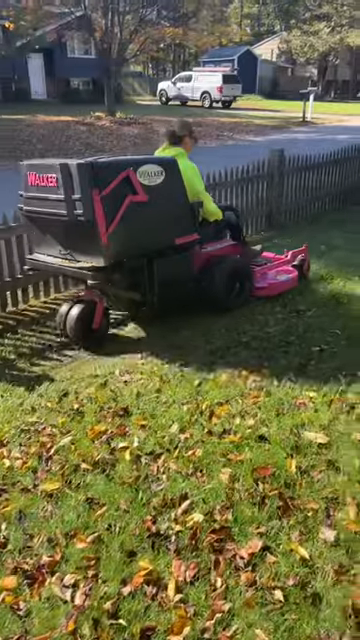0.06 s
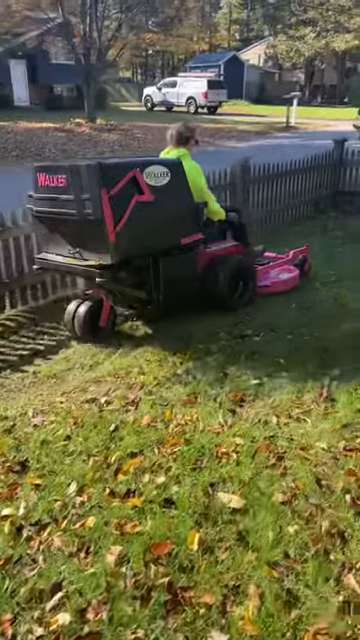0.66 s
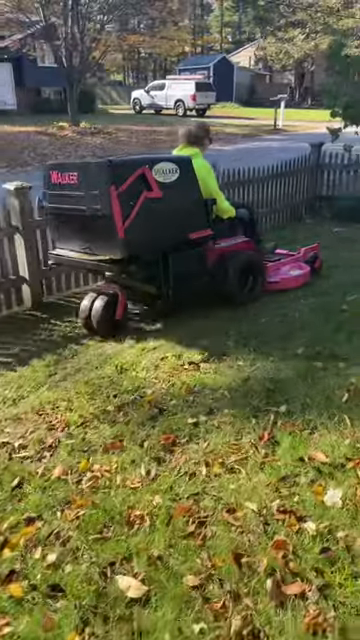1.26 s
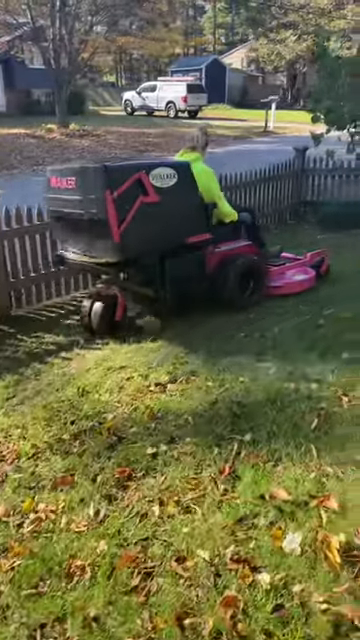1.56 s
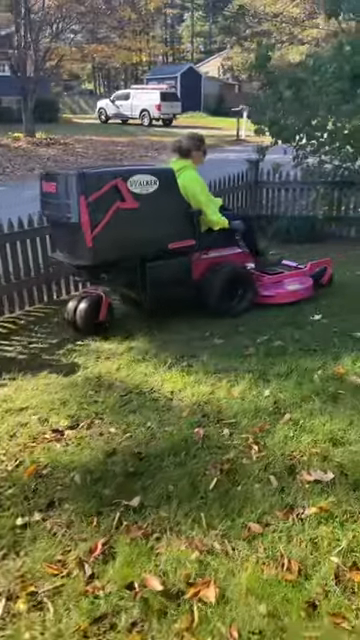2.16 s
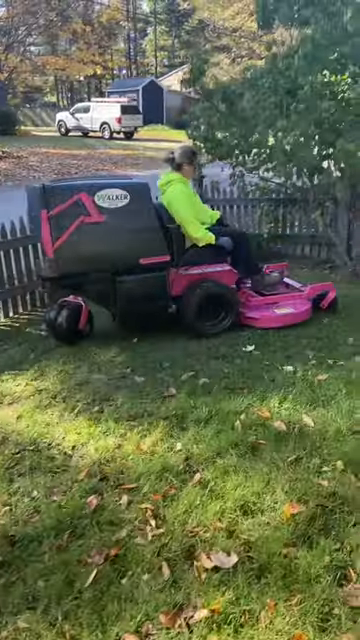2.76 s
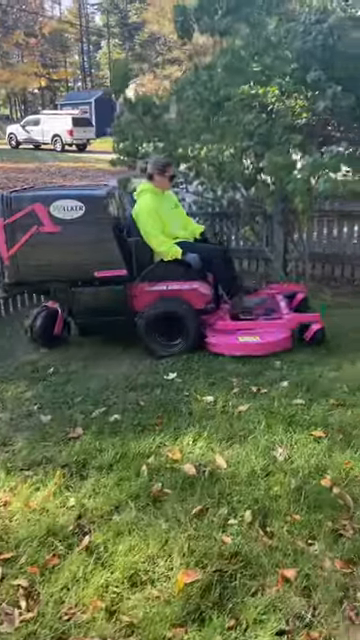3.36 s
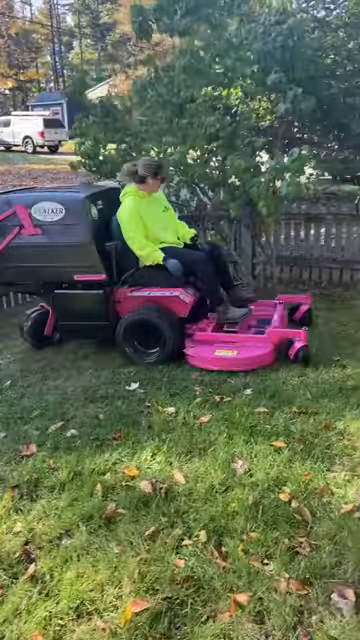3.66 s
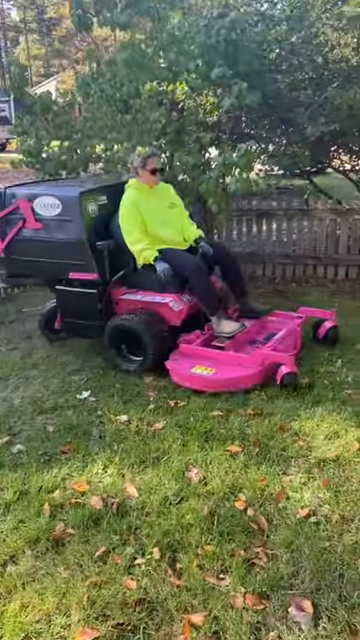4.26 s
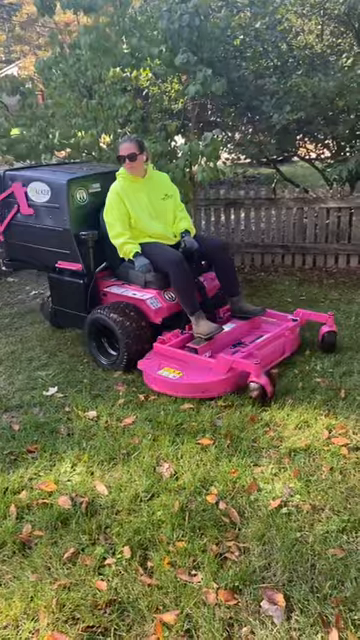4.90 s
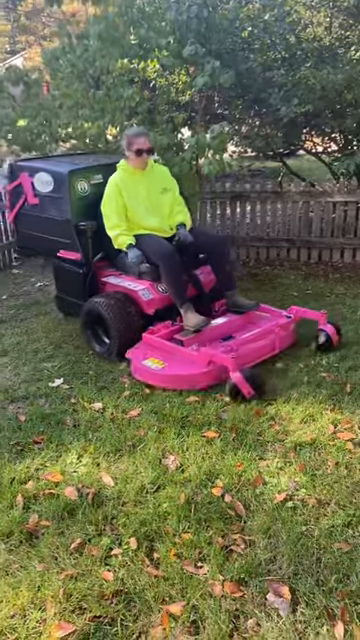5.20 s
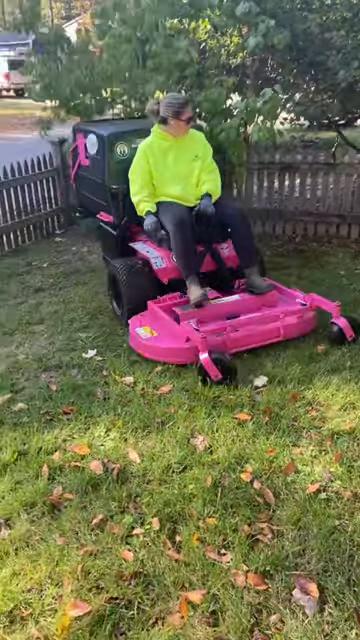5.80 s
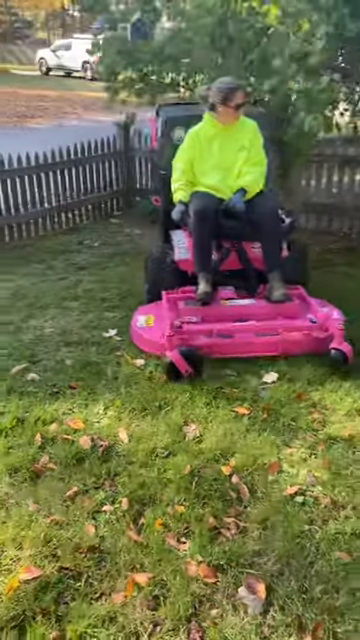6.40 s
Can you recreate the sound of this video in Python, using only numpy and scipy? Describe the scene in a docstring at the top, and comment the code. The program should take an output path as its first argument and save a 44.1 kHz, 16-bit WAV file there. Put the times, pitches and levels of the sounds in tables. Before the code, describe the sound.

A ride-on mower runs at steady speed on a leafy lawn. Its engine chugs under a low blade hum, a blower drone and a constant rush of air, with hissing leaves and a thin metallic ring. Twigs click against the deck now and then. As the mower turns to face the microphone, the hum swells and wavers, one twig snaps sharply, and an airy howl grows a little louder.

```python
"""A ride-on mower turns on a leafy lawn. It starts with its tail angled to the listener: one governed
engine chugs and drives blades and collector blower by belts, air roars through deck and chute, metal
rings thinly and twigs tick. Near 3 s it is side-on and the hopper shades the exhaust. From 4 s the
blades' octave swells and beats against the blower; the sharpest twig strikes at 5.4 s, and the chute's
howl rises in level as the nose comes round to face the listener."""
import sys
import numpy as np
from scipy import signal
from scipy.fft import rfft, irfft, next_fast_len
from scipy.io import wavfile
from scipy.ndimage import uniform_filter1d, map_coordinates

SR = 44100
rng = np.random.default_rng(int(sys.argv[2]) if len(sys.argv) > 2 else 0)


def to_wav(s):
    """Save 16-bit WAV."""
    ch = np.atleast_2d(s).T  # columns
    pcm = np.round(np.clip(ch, -1, 1) * 32767)  # PCM
    wavfile.write(sys.argv[1], SR, pcm.astype(np.int16))


N = 292824


def amp(db):
    """Decibels to gain."""
    return 10 ** (np.asarray(db) / 20)


def unit(x):
    """Scale to rms 1."""
    return x / np.sqrt(np.mean(x ** 2) + 1e-20)


def along(points, hz):
    """Read (f/Hz, value) points on a log frequency axis."""
    f, v = np.transpose(points)
    return np.interp(np.log(hz + 1), np.log(f + 1), v)


def colour(points):
    """An EQ curve: gain against frequency from (f/Hz, level/dB) points."""
    return lambda hz: amp(along(points, hz))


def curves(rows):
    """Automation lanes: one value per sample for each column after the time."""
    times, *columns = np.transpose(rows)
    return [np.interp(np.arange(N) / SR, times, column) for column in columns]


def wobble(rate):
    """A smooth random curve, rate knots a second."""
    knots = rng.standard_normal(int(N * rate / SR) + 4)
    coarse = np.arange(0, N + 32, 32)
    smooth = map_coordinates(knots, [coarse * rate / SR], mode="mirror")
    return np.interp(np.arange(N), coarse, smooth)


def filtered(x, response):
    """Pass x through a complex frequency response."""
    size = next_fast_len(N + SR // 4)
    return irfft(rfft(x, size) * response(np.fft.rfftfreq(size, 1 / SR)), size)[..., :N]


def tone(turns, db, flutter):
    """One partial following a count of cycles, its strength and phase shaken by turbulence."""
    angle = 2 * np.pi * turns + flutter * wobble(25)
    return np.sqrt(2) * amp(db) * (1 + flutter * wobble(25)) * np.sin(angle)


def overtones(turns, table, fade_db, flutter):
    """Weak partials that fade in and out as their paths to the listener shift."""
    return sum(tone(k * turns + rng.random(), db - 8 + fade_db * wobble(1.48), flutter)
               for k, db in table)


def throb(turns, depth):
    """A swell of loudness once per turn."""
    return unit(np.exp(depth * np.cos(2 * np.pi * (turns + rng.random()))))


# Stereo image of the turbulence, wider in the treble: f/Hz, left-right likeness/0-1
LIKENESS = [(60, .98), (150, .997), (280, .9995), (450, .99), (1300, .988), (1900, .996), (2500, .88),
            (3400, .82), (5000, .85), (10000, .86), (15000, .8)]
def rush(gain, patchy_db):
    """Stereo turbulence of rms 1, with drifting patches in its spectrum."""
    spectra = signal.stft(rng.standard_normal((2, N)), nperseg=1024)[2]
    patches = uniform_filter1d(rng.standard_normal(spectra.shape[1:]), size=5, axis=0)
    patches = uniform_filter1d(patches, size=30, axis=1)
    pair = signal.istft(spectra * amp(patchy_db * unit(patches)), nperseg=1024)[1][:, :N]
    width = lambda hz: np.arccos(np.clip(along(LIKENESS, hz), -1, 1)) / 2
    mid, side = filtered(pair, lambda hz: gain(hz) * np.array([np.cos(width(hz)), np.sin(width(hz))]))
    return unit(np.array([mid + side, mid - side]))


def resonance(hz, db, width_hz, side_db):
    """Turbulence ringing in a resonance whose pitch may drift; side_db sets its stereo width."""
    skirt = lambda f: 1 / (1 + (2 * f / width_hz) ** 2)
    real, imag = filtered(rng.standard_normal((2, 2, N)), skirt)
    angle = 2 * np.pi * np.cumsum(hz * np.ones(N)) / SR
    mid, side = real * np.cos(angle) + imag * np.sin(angle)
    return amp(db) * unit(mid + amp(side_db) * side * np.array([[1], [-1]]))


def buzz(turns, gain, size=2048, count=8):
    """A rough pattern that repeats every turn and keeps morphing: a comb of wavering partials."""
    patterns = signal.resample(rng.standard_normal((count, size // 16)), size, axis=1)
    place = ((turns + .012 * wobble(14)) % 1 * size).astype(int) % size
    blend = np.array([wobble(7) for _ in patterns])
    blend = blend / np.linalg.norm(blend, axis=0)  # equal-power morph
    return unit(filtered(np.sum(blend * patterns[:, place], axis=0), gain))


# The mower's turn: t/s, heading/deg (0 = tail to the listener, 180 = nose)
HEADING = [(0, 56.4), (2.75, 98.3), (6.64, 183.2)]
def beam(rear_db, front_db, share, null_deg, spacing_deg):
    """Level in dB over the turn of a sound leaving by two paths; share is the second path's gain."""
    heading, = curves(HEADING)
    turned = (heading - heading[0]) / (heading[-1] - heading[0])
    second_path = share * np.exp(2j * np.pi * (heading - null_deg) / spacing_deg)
    return rear_db + turned * (front_db - rear_db) + 20 * np.log10(np.abs(1 - second_path))


def facing(outlet_deg=93, spread_deg=7):
    """How openly the exhaust outlet faces the listener, 0-1."""
    return 1 / (1 + np.exp((outlet_deg - curves(HEADING)[0]) / spread_deg))


# Exhaust note: shaft order, rear level/dB, front level/dB, side-on cut/dB
EXHAUST_NOTE = [(1, -28, -30.5, 1.5), (1.5, -29, -35.5, 0), (2, -47, -39, 0), (2.5, -27.5, -28.5, 3.5),
                (3, -28.3, -33, 7), (4, -40, -39.5, 3), (4.5, -43, -43, 0)]
# Low puff of gas from the muffler: f/Hz, relative level/dB
CHUG_EQ = [(44, -18), (52, -3), (100, 0), (145, 0), (220, -14), (400, -40)]
# Whine of valve gear and cooling fan: shaft order, relative level/dB
WHINE_PARTIALS = [(11, -44), (20, -43), (27, -46)]
# Midrange clatter of the valve train: f/Hz, relative level/dB
CLATTER_EQ = [(500, -9.5), (800, -11), (1600, 4), (2200, -1.5), (2800, -4), (3500, -29.5)]
def engine(shaft, side_on_deg=106, spread_deg=15):
    """A four-stroke twin fires unevenly, giving half orders and a chug; the hopper shades it side-on."""
    exposed = facing()
    shade = np.exp(-((curves(HEADING)[0] - side_on_deg) / spread_deg) ** 2)
    exhaust = sum(tone(k * shaft + rng.random(), rear + exposed * (front - rear) - shade * cut, .05)
                  for k, rear, front, cut in EXHAUST_NOTE)
    chug = amp(-33.7) * throb(shaft / 2, depth=.3) * rush(colour(CHUG_EQ), patchy_db=1)
    whine = amp(3 * exposed) * overtones(shaft, WHINE_PARTIALS, fade_db=2, flutter=.3)
    valve_buzz = buzz(shaft, colour(CLATTER_EQ))
    valve_noise = throb(shaft, depth=.4) * rush(colour(CLATTER_EQ), patchy_db=1)
    return exhaust + chug + whine + amp(-35.5) * unit(valve_buzz + valve_noise)


# Fader ride on the blades' fundamental: t/s, relative level/dB
HUM_RIDE = [(0.08, -19.5), (0.3, -18), (1.34, -18.5), (1.47, -21.5), (2.07, -17), (2.26, -19.5),
            (3.0, -15.5), (3.65, -18.5), (5.08, -18.5), (5.8, -15.5), (6.56, -16)]
# Their octave, swelling as the deck comes round: t/s, relative level/dB
OCTAVE_RIDE = [(0, -26), (1.9, -27.5), (2.3, -54), (2.65, -32), (3.45, -35), (4.15, -22), (5.4, -21),
               (6.3, -30.5), (6.6, -27.5)]
# Faint edge on the hum: harmonic, relative level/dB
BLADE_PARTIALS = [(3, -43), (5, -46)]
def blades(passes):
    """The blade tips hum as they pass the deck wall."""
    hum = tone(passes, curves(HUM_RIDE)[0], flutter=.04)
    octave = tone(2 * passes, curves(OCTAVE_RIDE)[0], flutter=.04)
    return amp(.66) * (hum + octave) + overtones(passes, BLADE_PARTIALS, fade_db=3, flutter=.16)


# Body of the drone, one beam a harmonic:
# harmonic, rear level/dB, front level/dB, second path share/0-1, null/deg, null spacing/deg
DRONE_BEAMS = [(1, -36.5, -19, 0.5, 107, 80.4), (2, -23, -28.5, 0.5, 71, 74),
               (3, -35.5, -33.5, 0.47, 84, 82), (5, -40, -31.5, .95, 99.7, 74.6),
               (7, -42, -35, 0.24, 171, 91)]
# Fader rides on the fourth and ninth harmonics: t/s, level/dB
FOURTH_RIDE = [(0, -32), (1.9, -28.5), (2.6, -32), (3.5, -32), (4.5, -24), (5.0, -24.3), (5.4, -23),
               (6.05, -22.7), (6.4, -26), (6.6, -36)]
NINTH_RIDE = [(.45, -30.5), (1.9, -40.5), (2.2, -58), (2.85, -32), (3.4, -29.5), (4.15, -32), (4.65, -43),
              (5.7, -35), (6.6, -30.5)]
# Faint top of the drone: harmonic, relative level/dB
BLOWER_PARTIALS = [(6, -39), (8, -45), (10, -49), (18, -41)]
def blower(impeller):
    """The collector's impeller drones; its fifth harmonic beats against the blades' octave."""
    drone = sum(tone(k * impeller, beam(*shape), flutter=.035 * np.sqrt(k)) for k, *shape in DRONE_BEAMS)
    fourth = tone(4 * impeller, curves(FOURTH_RIDE)[0], flutter=.07)
    ninth = tone(9 * impeller, curves(NINTH_RIDE)[0], flutter=.15)
    return drone + fourth + ninth + overtones(impeller, BLOWER_PARTIALS, fade_db=-2, flutter=.27)


# Low-mid roar of the deck: f/Hz, relative level/dB
DECK_EQ = [(100, -30), (160, -5), (210, -1), (390, -1), (500, -6), (750, -1.5), (950, -9.5), (1400, -15),
           (3000, -58)]
def deck_roar():
    """Air churns under the cutting deck."""
    db = beam(rear_db=-28.5, front_db=-25, share=.08, null_deg=89, spacing_deg=72)
    return amp(db) * rush(colour(DECK_EQ), patchy_db=.7)


# Bright rush of the chute: f/Hz, relative level/dB
CHUTE_EQ = [(400, -52), (800, -7), (1050, 0), (1250, 0), (1700, 0), (2000, -4.5), (2400, -5), (3000, -6.5),
            (3500, -16), (6000, -52)]
# The chute's howl and the blower housing's resonance, shifting with the turn: t/s, f/Hz, level/dB
CHUTE_HOWL = [(2.1, 1480, -36.5), (2.9, 1433, -32.5), (4.1, 1412, -32.5), (4.9, 1460, -34.5),
              (5.65, 1521, -28), (6.1, 1414, -28.5), (6.6, 1370, -25.5)]
HOUSING_RING = [(0, 1873, -46), (1.75, 1854, -39), (3.3, 2088, -42.5), (5.05, 2192, -33.5),
                (5.7, 2022, -39), (6.6, 2087, -46)]
def chute_air(impeller):
    """Air chopped by the impeller rushes up the chute and blows chute, housing and hollow hopper."""
    chop = throb(impeller, depth=.063) * throb(impeller / 2, depth=.087)
    wakes = amp(-4) * buzz(impeller, colour(CHUTE_EQ))  # the vanes' wakes come round every turn
    flow_db = beam(rear_db=-29.5, front_db=-26.5, share=.07, null_deg=96, spacing_deg=96)
    flow = amp(flow_db + 1.24 * wobble(30)) * unit(rush(colour(CHUTE_EQ), patchy_db=1) + wakes)
    howl = resonance(*curves(CHUTE_HOWL), width_hz=165, side_db=-46)
    housing = resonance(*curves(HOUSING_RING), width_hz=230, side_db=-36)
    hopper_db = beam(rear_db=-42, front_db=-39, share=.2, null_deg=93.5, spacing_deg=59)
    hopper = resonance(hz=753.3, db=hopper_db, width_hz=115, side_db=-13)
    return chop * (flow + howl + housing + hopper)


# Raspy band that shifts as the machine turns: t/s, f/Hz, level/dB
RASP_BAND = [(0, 2760, -37), (.27, 2696, -35.5), (.55, 2785, -41), (1.07, 2680, -36), (1.47, 2860, -38),
             (1.7, 2764, -38), (1.85, 2810, -44), (3.5, 2860, -36), (4.2, 2920, -43), (4.8, 2910, -33.5),
             (5.4, 2917, -46.5), (6.1, 2780, -39), (6.6, 2770, -48)]
def rasp():
    """A band of noise rattles with a fast, uneven tremolo."""
    rattle = unit(amp(1.5 * wobble(14) + 2 * wobble(110)))
    return rattle * resonance(*curves(RASP_BAND), width_hz=300, side_db=-5)


# Sizzle of the leaves: f/Hz, relative level/dB
LEAF_EQ = [(1500, -41), (3200, -0.5), (4000, 4), (4500, 1), (5400, 2), (7000, -13), (9500, -6),
           (13000, -10.5), (15900, -25)]
def leaf_hiss(shaft):
    """Leaves hiss in the airstream, pulsing lightly with the engine."""
    db = beam(rear_db=-37.5, front_db=-35.5, share=.1, null_deg=109, spacing_deg=71)
    return amp(db + .85 * wobble(45)) * throb(shaft, depth=.074) * rush(colour(LEAF_EQ), patchy_db=2)


# Thin metal ring wandering between close pitches: t/s, f/Hz, rub strength/dB
METAL_RUB = [(.2, 4890, 3.3), (.4, 4880, .5), (.66, 4820, 1), (1.0, 4830, -4), (1.55, 4910, .5),
             (1.66, 4825, 1.5), (2.03, 4900, 0), (2.15, 4895, 8), (2.22, 4816, 3.5), (2.34, 4794, 2),
             (2.5, 4875, .5), (3.5, 4920, .5), (3.78, 4850, -3.5), (4.45, 4915, 2.3), (4.9, 4950, -1),
             (6.15, 4880, -1), (6.55, 4885, 1.5)]
def gearbox(turns, rest_db=-40, wander_hz=26):
    """The deck drive hums and rubs metal into a ring once a turn; hard rubs make the low mode squeal."""
    hz, rub_db = curves(METAL_RUB)
    db = rest_db + rub_db
    squeal_cycles = np.cumsum(hz + wander_hz * wobble(22)) / SR
    squeal = tone(squeal_cycles, db - 6 + .4 * rub_db, flutter=.5)
    low = resonance(hz, db - 2, width_hz=200, side_db=-11)
    middle = resonance(5115, -50 - 6 * facing(), width_hz=90, side_db=-3)
    high = resonance(6550, db - 13, width_hz=300, side_db=-6)
    ring = throb(turns, depth=.28) * (squeal + low + middle + high)
    return ring + tone(turns, db=-49, flutter=.3)


def swell(middle_s, length_s):
    """A smooth rise from 0 to 1 and back."""
    offset = np.clip((np.arange(N) / SR - middle_s) / length_s, -.5, .5)
    return np.cos(np.pi * offset) ** 2


# Tonal accents: part, harmonic, middle t/s, length/s, peak level/dB
FLARING_PARTIALS = [("blades", 5, 1.1, 5.0, -38.5), ("engine", 54, 1.92, .8, -43),
                    ("engine", 27, 2.0, 1.4, -38.5), ("blower", 18, 3.0, 1.1, -37.5),
                    ("blower", 12, 3.2, 1.1, -39), ("blower", 18, 5.7, 1.0, -35.5),
                    ("engine", 27, 6.15, .7, -39), ("blower", 18, 6.62, .5, -32)]
def flares(**turns):
    """Single partials of the rotating parts stand out as grille, chute and deck swing past."""
    return sum(swell(middle_s, length_s) * tone(k * turns[part] + rng.random(), db, flutter=.25)
               for part, k, middle_s, length_s, db in FLARING_PARTIALS)


# Twigs and grit hitting the deck: t/s, relative level/dB, knock under the click/0-1
TWIG_HITS = [(0.198, -29, .5), (0.714, -29, 0), (0.823, -24, .2), (1.212, -25, 0), (1.254, -23, .1),
             (2.971, -32, 0.4), (3.361, -30, 0.42), (3.62, -29, 0), (3.82, -33, 0.1), (4.003, -26.5, 0.95),
             (4.011, -27, .1), (4.269, -28, .5), (4.399, -29, 0.62), (5.368, -18, .6)]
# The crisp click and the duller knock under it: f/Hz, relative level/dB
CLICK_EQ = [(3000, -18), (6000, -2), (8500, 0), (11500, -1), (15900, -9)]
KNOCK_EQ = [(2500, -9), (4000, 0), (6500, -1), (10000, -11)]
def debris(stem_count=70):
    """Twigs click against the deck, the heavier ones with a knock; leaf stems crackle among them."""
    t = np.arange(SR // 25) / SR
    crack = amp(-60 * t / .0055) + .24 * amp(-60 * t / .092)  # snap plus a short tail
    stems = [(when * N / SR, -42 + 8 * force, 0) for when, force in rng.random((stem_count, 2))]
    envelopes = np.zeros((2, N + SR))
    for start_s, db, knock_share in list(TWIG_HITS) + stems:
        start = int(start_s * SR)
        envelopes[:, start:start + len(t)] += amp(db) * np.outer([1, knock_share], crack)
    click, knock = envelopes[:, :N]
    return click * rush(colour(CLICK_EQ), patchy_db=1) + knock * rush(colour(KNOCK_EQ), patchy_db=-9.5)


# Engine shaft speed, sagging and recovering under the governor: t/s, f/Hz
SHAFT_SPEED = [(0, 60.45), (.45, 60.6), (.75, 60.35), (1.05, 60.55), (2.35, 60.27), (3.05, 60.8),
               (3.85, 60.25), (4.5, 60.9), (4.85, 61.03), (5.4, 60.65), (6.45, 60.1)]
def scene():
    """The mix: every rotating part is locked to the engine shaft by its drive ratio."""
    shaft = np.cumsum(curves(SHAFT_SPEED)[0]) / SR  # turns so far
    passes, impeller, gears = 3.449 * shaft, 1.3655 * shaft, .82 * shaft
    machine = engine(shaft) + blades(passes) + blower(impeller)
    air = deck_roar() + chute_air(impeller) + rasp() + leaf_hiss(shaft)
    accents = gearbox(gears) + flares(engine=shaft, blades=passes, blower=impeller) + debris()
    return machine + air + accents


# Left microphone port over the right: f/Hz, level/dB
LEFT_BALANCE = [(380, 0), (560, -.4), (750, 2), (950, .6), (1150, .8), (1450, -.3), (2100, 0), (2370, -2),
                (2900, 0), (3250, 3), (3600, -.3), (5200, 0)]
# Phase by which the left port leads: f/Hz, phase/rad
LEFT_LEAD = [(330, 0), (420, .04), (750, .1), (2250, 0), (2420, .9), (3150, .9), (3450, .1), (4350, .45),
             (5250, .2), (5650, .75), (6900, 2.9), (9700, 6), (11000, 6.4), (15600, 12.2)]
def record(dry, top_hz=15900):
    """Two microphone ports differ a little in level and, in the treble, in phase; the top is cut off."""
    halves = np.array([[.5], [-.5]])
    balance = lambda hz: amp(halves * along(LEFT_BALANCE, hz))
    phase = lambda hz: np.exp(1j * halves * along(LEFT_LEAD, hz))
    return filtered(dry, lambda hz: balance(hz) * phase(hz) * (hz < top_hz))


dry = scene()
out = record(dry)
to_wav(out)
```